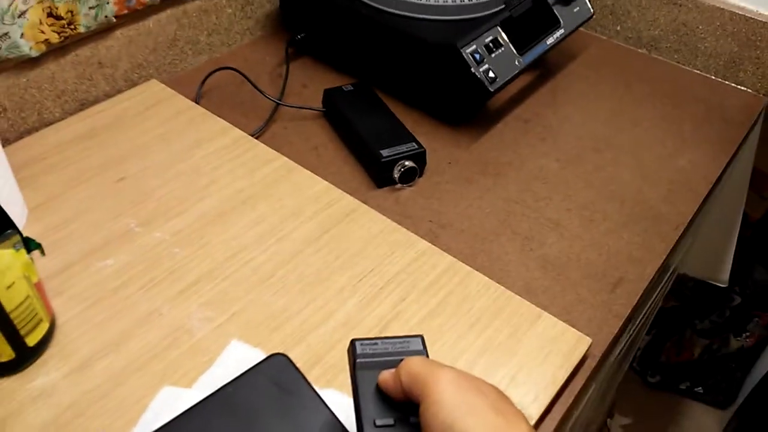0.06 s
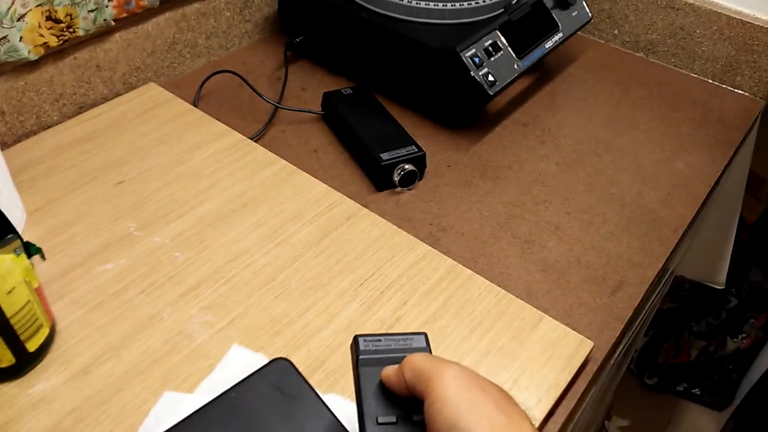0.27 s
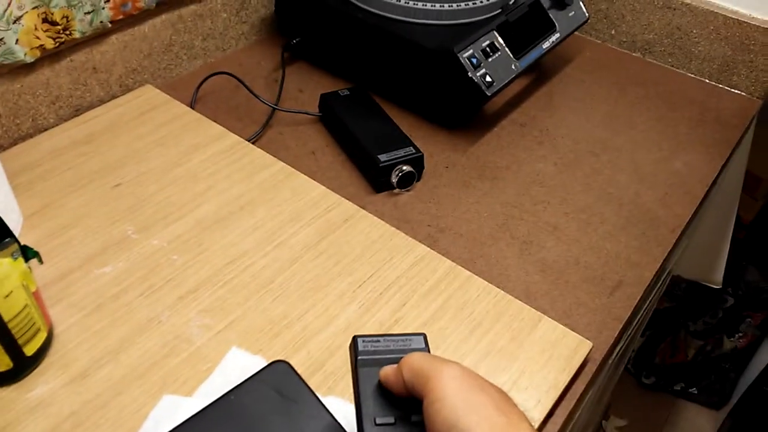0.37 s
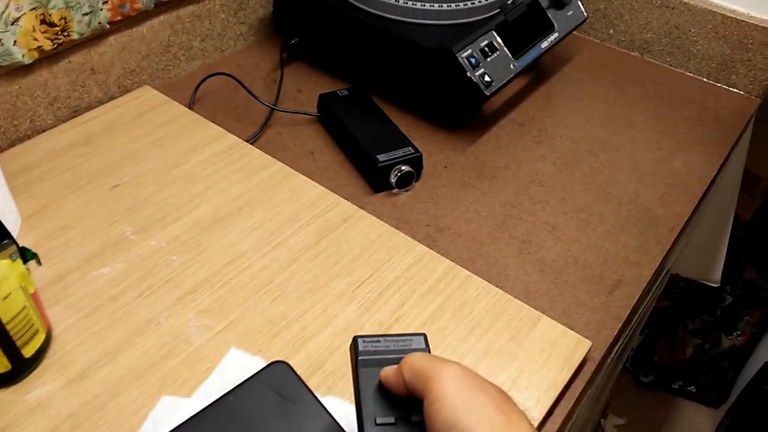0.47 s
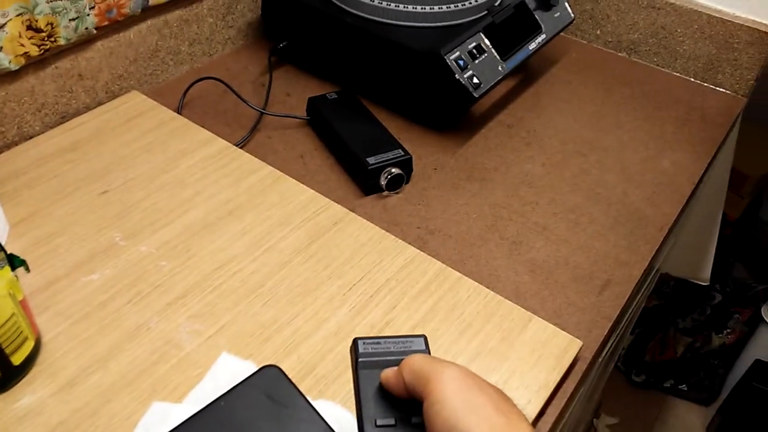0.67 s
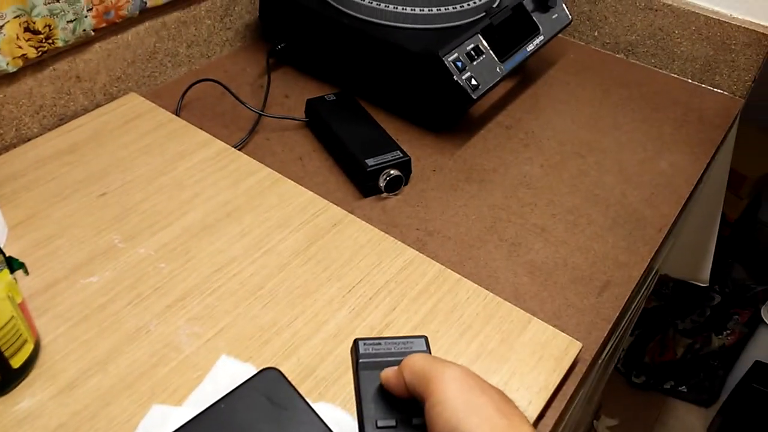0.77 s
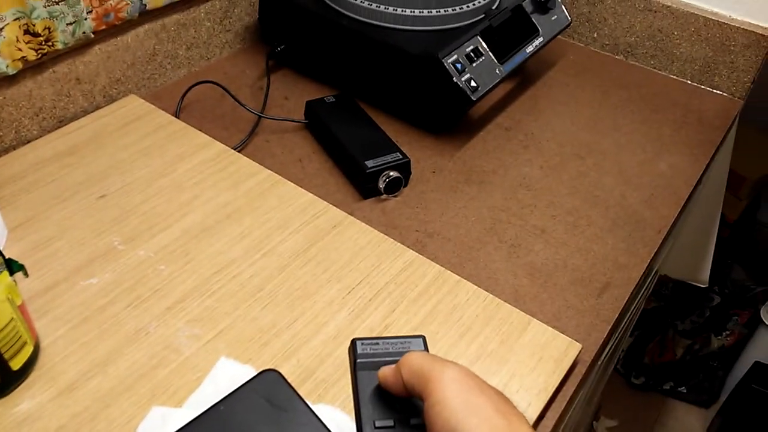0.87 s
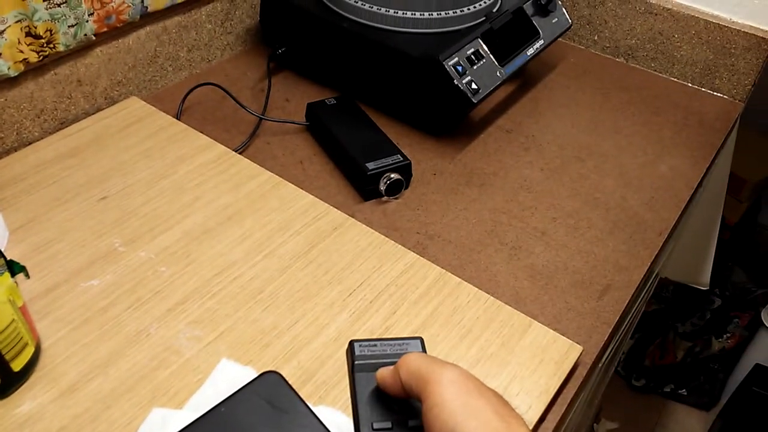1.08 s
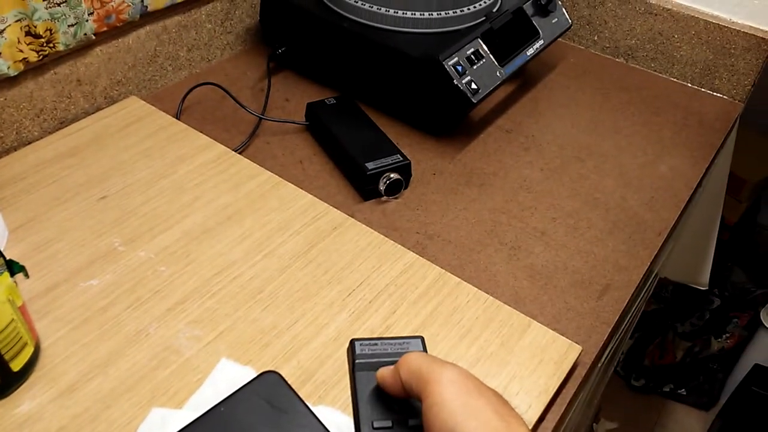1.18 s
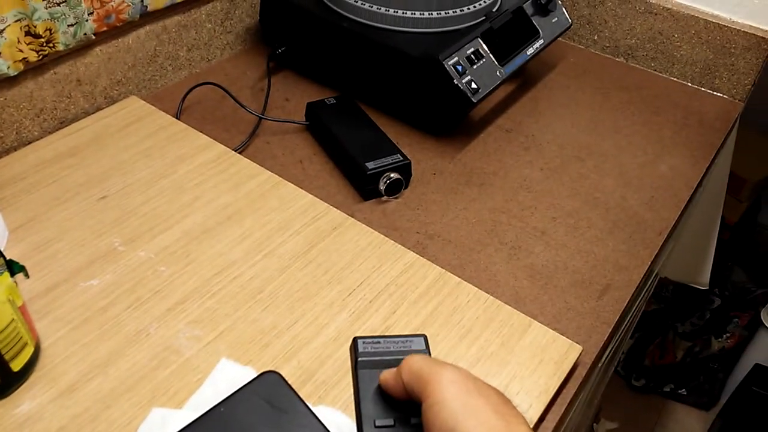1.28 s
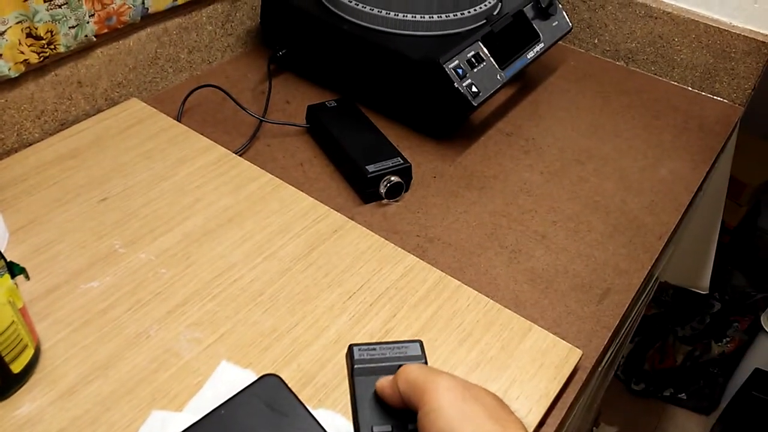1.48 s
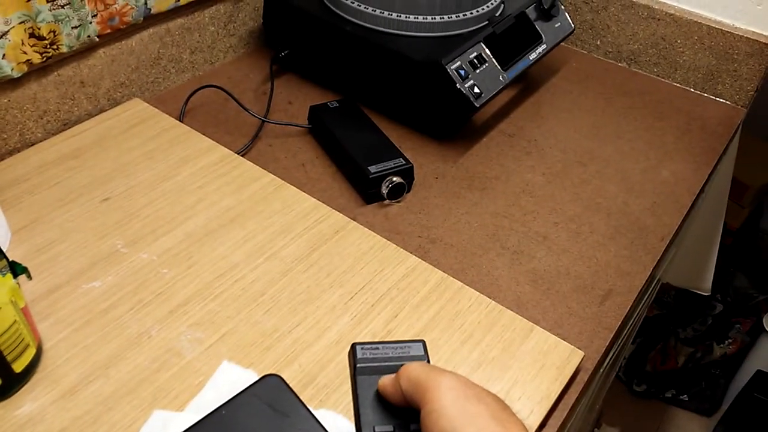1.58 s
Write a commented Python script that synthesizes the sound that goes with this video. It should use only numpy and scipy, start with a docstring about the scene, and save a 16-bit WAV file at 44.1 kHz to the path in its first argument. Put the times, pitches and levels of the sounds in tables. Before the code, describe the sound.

A slide projector changes one slide with a loud clack and clicks over its fan hum.

```python
"""Slide projector, one change

A projector on a desk in a small room, close to a single microphone. Its fan blows and its motor hum throbs
slowly throughout. After a faint squeak the drive engages with a loud clack, the lift arm knocks, the gate
snaps, a latch ticks, the slide drops with a hollow clunk and a spring rattles to rest."""
import sys
import numpy as np
from scipy.fft import rfft, irfft, next_fast_len
from scipy.io import wavfile
from scipy.ndimage import map_coordinates

SR = 44100
rng = np.random.default_rng(int(sys.argv[2]) if len(sys.argv) > 2 else 0)


def generate_wav(sig):
    """Save sig (samples, or channels by samples) to the path in sys.argv[1] as 16-bit PCM at SR."""
    pcm = np.round(np.clip(np.atleast_2d(sig).T, -1, 1) * 32767).astype(np.int16)
    wavfile.write(sys.argv[1], SR, pcm)


N = 72765


def amp(db):
    """Decibels to gain."""
    return 10 ** (np.asarray(db) / 20)


def unit(x):
    """Scale to rms 1."""
    return x / np.sqrt(np.mean(x ** 2) + 1e-20)


def along(points, hz):
    """Read a curve of (frequency, value) points at hz, on a log frequency axis."""
    freqs, values = np.transpose(points)
    return np.interp(np.log(hz + 1), np.log(freqs + 1), values)


def filtered(x, response):
    """Filter x by a gain given as a function of frequency."""
    size = next_fast_len(len(x) + SR // 10)
    return irfft(rfft(x, size) * response(np.fft.rfftfreq(size, 1 / SR)), size)[:len(x)]


def rush(spectrum):
    """Steady noise of rms 1 with the given colour."""
    return unit(filtered(rng.standard_normal(N), lambda hz: amp(along(spectrum, hz))))


def add(track, start_s, sound):
    """Mix a sound into the track."""
    span = track[round(start_s * SR):][:len(sound)]
    span += sound[:len(span)]


def fan():
    """Air rushes through the case and sounds its narrow resonances."""
    # colour of the rushing air: (frequency [Hz], relative level [dB])
    air_colour = [(28, -24), (42, 7), (75, -2), (110, -3.5), (160, -9.5), (240, -3), (500, 1.5), (630, -8),
                  (1230, -3), (1400, -16.5), (1750, -7), (2400, -14.5), (3100, -23.5), (4600, -20.5),
                  (6800, -25.5), (8800, -22), (11500, -31.5), (16000, -35)]
    # resonances of the air path: (frequency [Hz], width [Hz], level [dB])
    duct_modes = [(217, 70, -60.5), (295, 40, -55), (349.4, 60, -55.5), (489, 77, -55.5), (798, 28, -58.5),
                  (1138, 75, -59)]
    duct = np.zeros(N)
    for hz, width, db in duct_modes:
        band = filtered(rng.standard_normal(N), lambda f: 1 / (1 + ((f - hz) / width) ** 2) ** 2)
        duct += amp(db) * unit(band)
    return amp(-46.5) * rush(air_colour) + duct


def motor():
    """The fan shaft turns a little slower than the motor, so the two beat; the mains adds an overtone."""
    motor_hz, shaft_hz, mains_hz = 59.2, 55.35, 60
    waver_db, wavers_per_s = 0.5, 45
    t = np.arange(N) / SR - 0.05  # the throb first peaks at 0.05 s
    tones = [(motor_hz, -43.3), (shaft_hz, -52), (4 * mains_hz, -53.5)]  # (frequency [Hz], rms [dB])
    hum = np.sqrt(2) * sum(amp(db) * np.sin(2 * np.pi * hz * t) for hz, db in tones)
    waver = map_coordinates(rng.standard_normal(200), [np.arange(N) * wavers_per_s / SR])
    return hum * amp(waver_db * waver)


def squeak():
    """A faint narrow tone swells and fades before the clack."""
    peak_s, half_width_s, pitch_hz = 0.08, 0.024, 1707
    t = np.arange(N) / SR
    swell = np.exp(-((t - peak_s) / half_width_s) ** 2)
    return amp(-49.5) * swell * np.sin(2 * np.pi * pitch_hz * t)


def strike(modes, t60, levels_db, ripple):
    """One contact: a crack, the part's own modes, the dense ring of the case and the room's answer."""
    # centres of the bass, middle, treble and top bands: (frequency [Hz])
    band_hz = [400, 2300, 7000, 13500]
    # span over which each band's level spreads: (width [Hz])
    band_width_hz = [614, 2470, 6640, 5800]
    # colour of the case's dense ringing: (frequency [Hz], gain [dB])
    case_colour = [(175, -22.5), (275, 0.5), (480, -1.5), (650, -3), (950, 2.5), (1550, -0.5), (2400, -0.5),
                   (5400, 0.5), (7000, -3.5), (8800, 4.5), (11000, 3.5), (16000, 1.5)]
    rise_s, crack_t60_s, room_t60_s = 0.0014, 0.0064, 0.22
    cluster_db, cluster_width = 5.5, 0.071  # half width as a share of the mode's pitch
    ripple_db, ripple_step_hz = 2.6, 70
    band_levels = np.transpose([band_hz, levels_db])
    band_density = np.transpose([band_hz, levels_db - 10 * np.log10(band_width_hz)])  # dB in 1 Hz
    t = np.arange(SR // 2) / SR

    def response(f):
        """The noise has many small peaks and gathers around each strong mode."""
        peaks = unit(amp(ripple_db * map_coordinates(ripple, [f / ripple_step_hz])))
        humps = [amp(db + cluster_db) / (1 + ((f / hz - 1) / cluster_width) ** 2) for hz, db, _ in modes]
        cluster = np.sqrt(1 + sum(hump ** 2 for hump in humps))
        colour = amp(along(band_density, f) + along(case_colour, f))
        return np.sqrt(SR / 2) * peaks * cluster * colour

    def burst(gain_db, decay_s):
        """Coloured noise that falls 60 dB in decay_s."""
        return filtered(rng.standard_normal(len(t)), response) * amp(gain_db - 60 * t / decay_s)

    crack = burst(-2, crack_t60_s)
    case = burst(-1.5, t60)
    room = burst(-17.5, room_t60_s)
    ring = np.zeros(len(t))
    for hz, db, mode_t60 in modes:
        start_db = db + along(band_levels, hz) + rng.normal(0, 1)
        ring += amp(start_db - 60 * t / mode_t60) * np.sin(2 * np.pi * hz * t)
    rise = 1 - np.exp(-t / rise_s)
    return crack + rise * (case + room + amp(-1.5) * ring)


def changer():
    """Parts strike and the linkage ticks through one slide change, over the rubbing of the turning cam."""
    # modes of each part: (frequency [Hz], gain [dB], t60 [s])
    part_modes = { "housing": [(333, 0.5, 0.11), (532, -4, 0.17), (974, -4.5, 0.051), (1273, -6.5, 0.11),
                  (1890, -6, 0.12), (2224, -7.5, 0.077), (2498, -8.5, 0.098), (2972, -11, 0.064),
                  (4630, -18, 0.076), (7300, -7, 0.043)], "slide": [(342, 3, 0.11), (468, 0, 0.081),
                  (1106, -5, 0.2), (1317, -12, 0.18), (2330, -5, 0.16), (2510, -2.5, 0.13),
                  (3020, -2, 0.083)], "arm": [(1852, 1.5, 0.096), (2180, 2.5, 0.05), (2304, 3.5, 0.037),
                  (2475, 2, 0.048), (2990, 4, 0.11), (4780, 0.5, 0.043)], "gate": [(3430, -4.5, 0.063),
                  (4180, 0.5, 0.096), (8450, -4, 0.05), (9150, -2, 0.052), (10630, -9, .1)],
                  "spring": [(2153, -3, 0.17), (6250, -10, 0.062), (6570, -11, 0.073), (8220, -1.5, 0.056)],
                  "linkage": [(2410, -10.5, 0.064), (4600, -5.5, 0.1), (7000, -17, 0.036),
                  (9500, -18, 0.069)], }
    # contacts: (time [s], part, t60 of the case [s], bass [dB], middle [dB], treble [dB], top [dB])
    blows = [ (0.1959, "spring", 0.09, -25, -35.5, -19, -43),
             (.2030, "housing", 0.15, -28, -25, -18.5, -32),
             (0.2144, "housing", 0.096, -27, -19.5, -13.5, -28.5),
             (0.2185, "housing", 0.07, -29, -23, -17, -28), (.2290, "housing", 0.2, -29, -31.5, -27.5, -45),
             (.2550, "housing", 0.095, -56, -26, -27.5, -40), (0.3863, "arm", 0.12, -42, -31.5, -34, -53),
             (0.4376, "linkage", 0.12, -35, -44, -33, -50.5),
             (.5160, "linkage", 0.19, -40, -44.5, -42.5, -52.5), (0.655, "arm", 0.13, -55, -50.5, -59, -62),
             (0.7632, "spring", 0.14, -43, -35.5, -32, -42.5), (0.7921, "arm", 0.057, -41, -38, -56, -69),
             (0.812, "arm", 0.11, -30, -40, -50, -78), (0.821, "arm", 0.17, -38, -38, -42, -68),
             (.9080, "gate", 0.12, -41, -31, -18.5, -35.5), (0.9216, "gate", 0.12, -37, -24.5, -32.5, -61),
             (0.9839, "linkage", 0.098, -56, -32.5, -27.5, -37),
             (1.0238, "slide", 0.13, -31.5, -37.5, -24, -57),
             (1.0367, "slide", 0.11, -36, -30.5, -24, -47.5), (1.0990, "spring", 0.077, -42, -47, -33, -50),
             (1.1120, "spring", 0.22, -49, -54, -31.5, -73),
             (1.1218, "spring", 0.067, -35, -55, -27.5, -43.5),
             (1.1303, "spring", 0.1, -40, -44.5, -32.5, -50), ]
    # light ticks of the linkage: (time [s], level [dB])
    ticks = [(0.128, -51), (.189, -40), (0.339, -50), (0.53, -47), (.559, -45), (0.61, -47.5), (.752, -50),
             (1.202, -51), (1.429, -52), (1.638, -54.5)]
    # colour of the cam's rubbing: (frequency [Hz], relative level [dB])
    cam_colour = [(100, -18), (260, 0.5), (550, 4.5), (2200, -6.5), (3500, -14), (9000, -17), (16000, -45)]
    # strength of the rubbing as the cam turns: (time [s], level [dB])
    cam_levels = [(.2, -52), (.33, -43.5), (.55, -48), (.72, -55.5), (.85, -46), (1.121, -44), (1.35, -64)]
    tick_colour_db, tick_t60_s = np.array([-2, -4, 4, -10.5]), 0.19  # colour runs from bass to top
    # each part has its own many small resonances: one random value every 70 Hz
    ripple = {part: rng.standard_normal(SR // 70) for part in part_modes}
    contacts = np.zeros(N)
    for start_s, part, t60, *levels_db in blows:
        add(contacts, start_s, strike(part_modes[part], t60, np.array(levels_db), ripple[part]))
    for start_s, db in ticks:
        tick = strike(part_modes["linkage"], tick_t60_s, db + tick_colour_db, ripple["linkage"])
        add(contacts, start_s, tick)
    rub_db = np.interp(np.arange(N) / SR, *np.transpose(cam_levels))
    return contacts + rush(cam_colour) * amp(rub_db)


def scene():
    """The whole projector from beside the desk, in mono."""
    return (changer() + fan() + motor() + squeak())[None]


def record(dry):
    """The microphone takes in nothing above the very top of the treble."""
    top_hz = 15850
    return np.array([filtered(channel, lambda hz: hz < top_hz) for channel in dry])


dry = scene()
out = record(dry)
generate_wav(out)
```